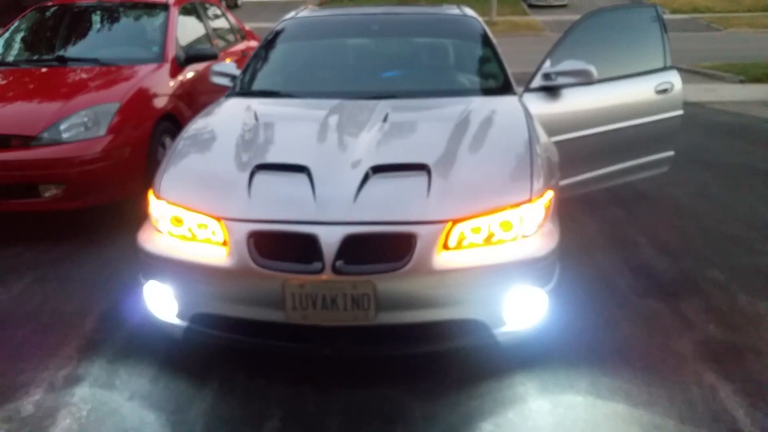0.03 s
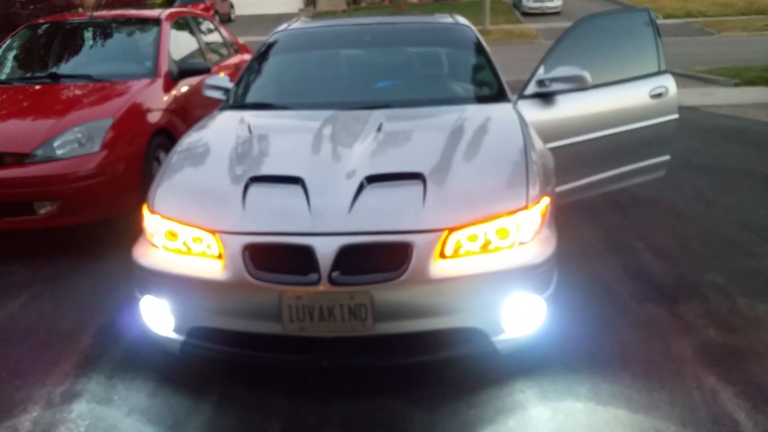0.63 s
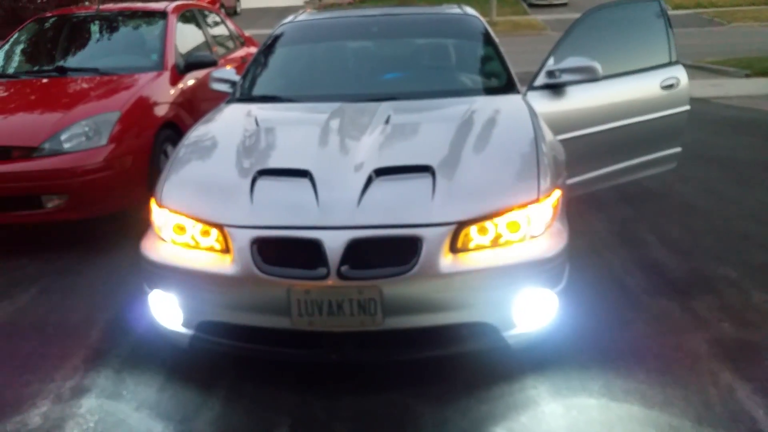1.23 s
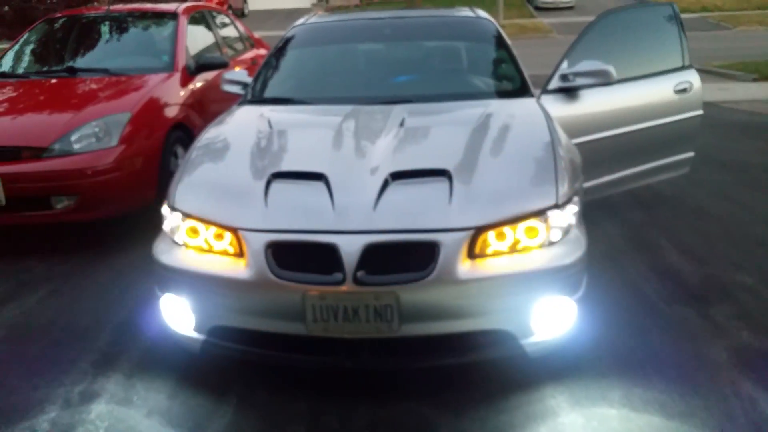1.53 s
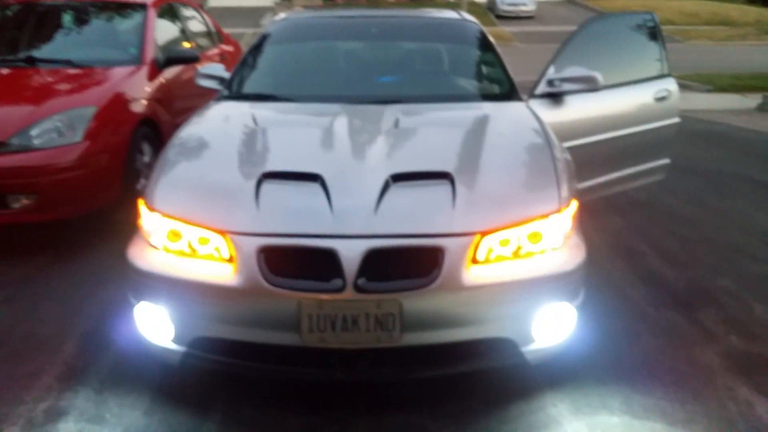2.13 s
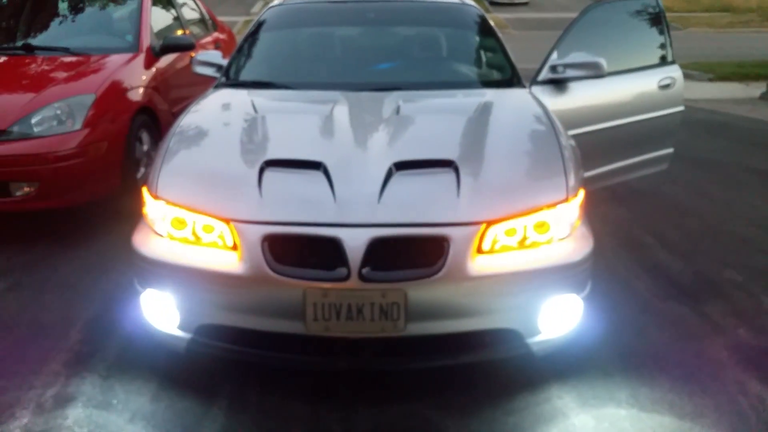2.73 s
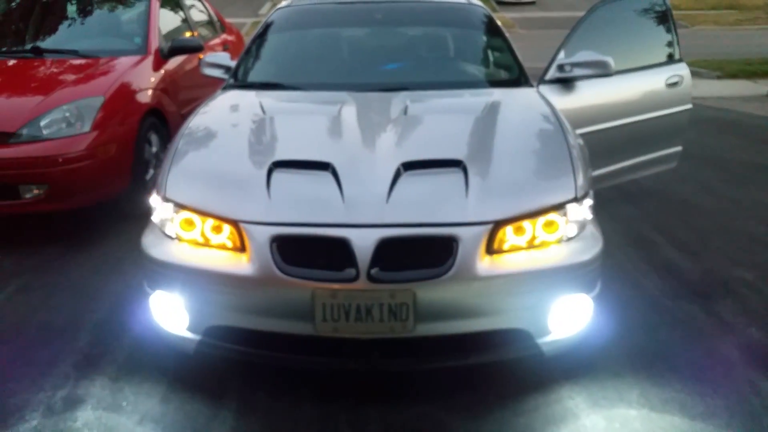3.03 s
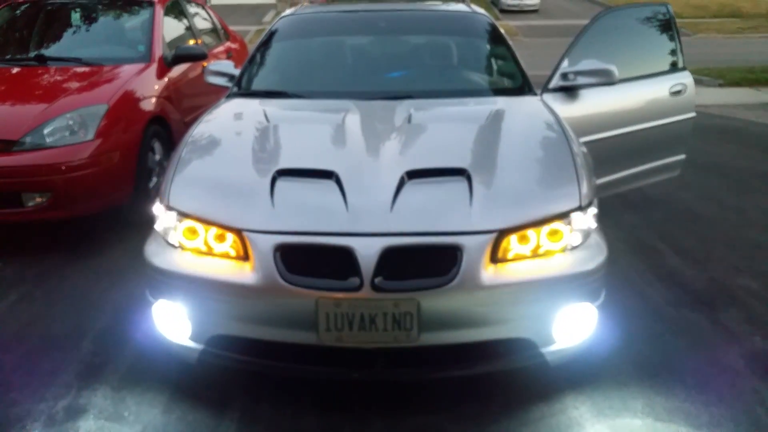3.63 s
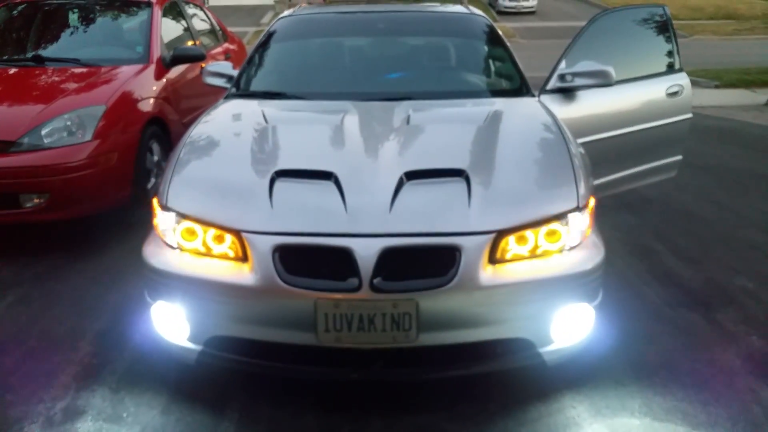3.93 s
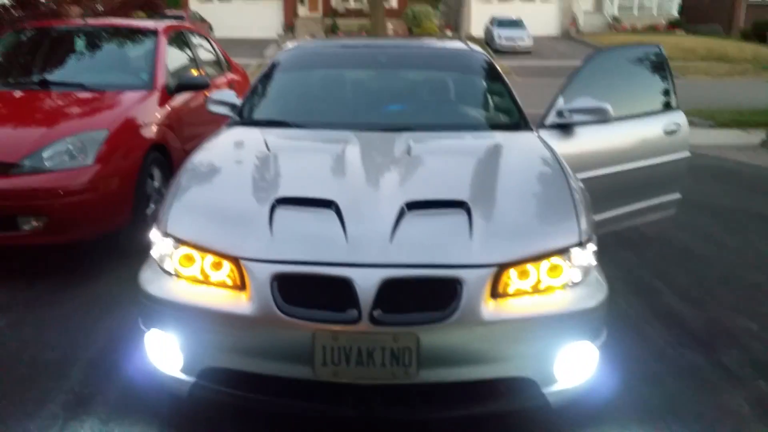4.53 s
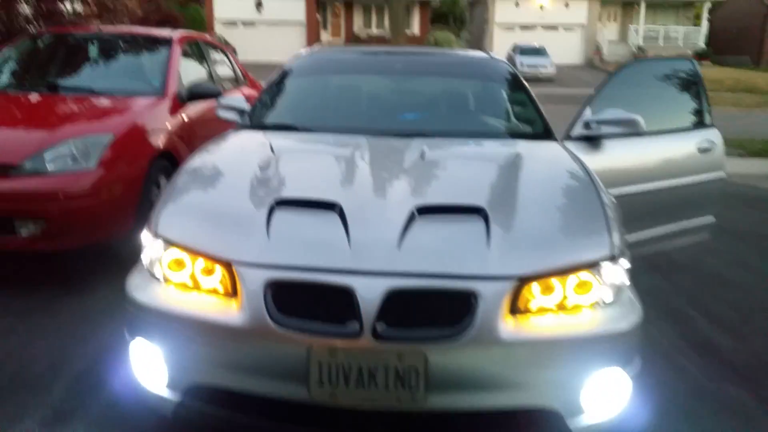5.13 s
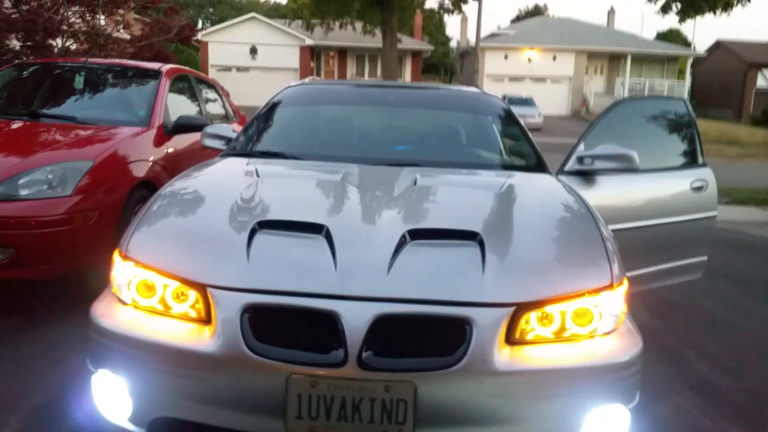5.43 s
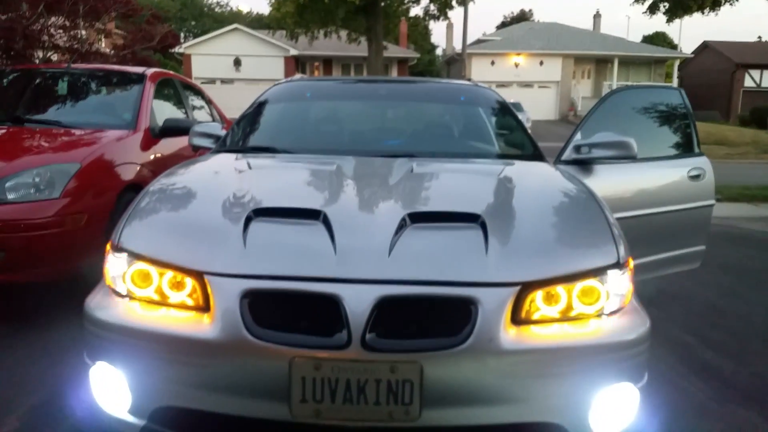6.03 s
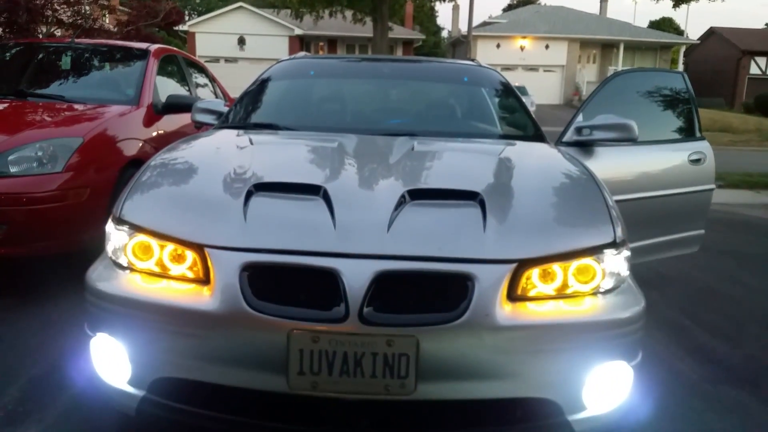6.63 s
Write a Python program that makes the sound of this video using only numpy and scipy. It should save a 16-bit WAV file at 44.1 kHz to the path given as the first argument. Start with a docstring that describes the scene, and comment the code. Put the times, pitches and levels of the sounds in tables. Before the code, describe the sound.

A car engine idles with a low, uneven hum and light valve ticking, while a shoe scuffs the asphalt twice.

```python
"""A six-cylinder car idles on a driveway, heard from in front; the sound fades in from 0.4 s.
Uneven firings of two banks boom through the exhaust's resonances, the engine bay rushes, valves tick
and parts rattle over a faint street rumble. The idle hunts; from 0.8 s spells of weak burns make it lope.
From 1.5 s the listener edges closer, and from 1.7 s a loose valve clacks now and then.
A shoe scuffs the asphalt at 2.4 s and 4.7 s."""
import sys
import numpy as np
from scipy import signal
from scipy.fft import rfft, irfft, next_fast_len
from scipy.io import wavfile
from scipy.ndimage import uniform_filter1d, minimum_filter1d, map_coordinates

SR = 44100
rng = np.random.default_rng(int(sys.argv[2]) if len(sys.argv) > 2 else 0)


def unload_wav(signal):
    """Save mono or channel-first audio to the path in sys.argv[1] as 16-bit WAV at rate SR, clipped to [-1, 1]."""
    wavfile.write(
        sys.argv[1],
        SR,
        np.round(np.clip(np.atleast_2d(signal).T, -1, 1) * 32767).astype(np.int16),
    )


N = 299439

# cylinders in firing order: (pulse strength [ratio], valve tick [dB])
FIRING_ORDER = [(0.86, -10.5), (1.09, 1.5), (0.85, -3), (1.034, 2.5), (0.88, -8.5), (0.81, 4)]


def amp(db):
    """Decibels to gain."""
    return 10 ** (np.asarray(db) / 20)


def unit(x):
    """Scale to rms 1."""
    return x / np.sqrt(np.mean(x ** 2) + 1e-20)


def along(points, hz):
    """Interpolate (frequency [Hz], value) points on a log axis."""
    f, v = np.transpose(points)
    return np.interp(np.log(hz + 1), np.log(f + 1), v)


def curve(points):
    """Interpolate (time [s], value) points at every sample."""
    return np.interp(np.arange(N) / SR, *np.transpose(points))


def wobble(rate_hz):
    """Smooth random curve with knots at rate_hz."""
    knots = rng.standard_normal(int(N * rate_hz / SR) + 4)
    return map_coordinates(knots, [np.arange(N) * rate_hz / SR])


def filtered(x, response):
    """Apply a complex frequency response."""
    m = next_fast_len(N + SR // 2)
    return irfft(rfft(x, m) * response(np.fft.rfftfreq(m, 1 / SR)), m)[..., :N]


def resonance(f, centre_hz, width_hz):
    """Causal response of one mode."""
    return 1j * f * width_hz / (centre_hz ** 2 - f ** 2 + 1j * f * width_hz)


def pan(db):
    """Stereo gains with left db above right."""
    return amp(np.array([[.5], [-.5]]) * db)


def stereo_noise(colour):
    """Coloured noise of rms 1; the sides are alike in the low mids, unrelated in the treble."""
    # (frequency [Hz], left-right likeness [ratio])
    likeness = [(60, -0.02), (130, 0.28), (290, 1), (640, 0.68), (1410, 0.43), (3100, 0.12), (6820, 0.006),
                (15000, -0.47)]

    def mid_side(f):
        angle = np.arccos(np.clip(along(likeness, f), 0, 1)) / 2
        return colour(f) * np.array([np.cos(angle), np.sin(angle)])

    mid, side = filtered(rng.standard_normal((2, N)), mid_side)
    return unit(np.array([mid + side, mid - side]))


def level_db(rpm, far_db, midway_db, close_db, db_per_rpm, idle_rpm=770):
    """Level of an engine source by listener position and engine speed."""
    # walk towards the hood: (time [s], place [0 far, 1 midway, 2 close])
    walk = [(1.5, 0.065), (2.25, 1.1), (4.4, 1.05), (5.15, 1.4), (5.65, 1.9), (6.25, 2)]
    return np.interp(curve(walk), [0, 1, 2], [far_db, midway_db, close_db]) + db_per_rpm * (rpm - idle_rpm)


def firings(crank):
    """Sample and cylinder of each whole crank step."""
    at = np.flatnonzero(np.diff(np.floor(crank)) > 0)
    return at, np.floor(crank[at + 1]).astype(int) % len(FIRING_ORDER)


def exhaust(crank, rpm, scatter=0.11, jitter_s=0.00047, gas_db=-22, thud_scatter=0.18, burble_scatter=0.66):
    """One uneven pulse a firing, plus turbulence; the banks alternate and drive the pipe differently."""
    # (frequency [Hz], width [Hz], front bank drive [signed gain], rear bank drive [signed gain])
    pipe_modes = [(59.5, 17.3, -0.28, -0.041), (70.2, 25, 0.309, 0.056), (103.9, 14.23, -0.39, 0.37),
                  (126.9, 22.46, 0.1916, -0.423), (134.2, 10.1, 0.021, 0.3), (175.5, 35.4, -0.079, 0.139),
                  (188, 27.8, 0.068, -0.114), (248.3, 8, -0.0112, 0.0016)]
    # thud, boom, hollow hum, burble: (far [dB], midway [dB], close [dB], slope [dB/rpm])
    band_levels = [(-23, -21.5, -19, -0.0272), (-14.4, -15.5, -20.5, 0.083), (-21, -18.5, -20.5, -0.056),
                   (-27.5, -26, -25, -0.0024)]
    edges_hz = [1, 86, 110, 152, 2000]
    at, cylinder = firings(crank)
    size_draw, time_draw, burble_draw, thud_draw = rng.standard_normal((len(at), 4)).T
    burn = burn_strength(crank, at)
    size = np.array(FIRING_ORDER)[cylinder, 0] * (1 + scatter * size_draw)
    onsets = np.clip(at + np.round(jitter_s * SR * time_draw).astype(int), 0, N - 1)
    turbulence = amp(gas_db) * rng.standard_normal((2, N))
    pipe = lambda f: sum(resonance(f, hz, width) * np.array([[front], [rear]])
                         for hz, width, front, rear in pipe_modes)
    muffler = lambda f: 1 / (1 + (37 / (f + 1)) ** 6) / (1 + (f / 320) ** 6)
    lowpass = lambda f, edge_hz: 1 / (1 + (f / edge_hz) ** 24)
    # weak burns cut the low bands most; the pulses' slow tails and sharp edges vary most
    strengths = [size * burn * (1 + thud_scatter * thud_draw),
                 size * burn,
                 size * (1 + burn) / 2,
                 size * (1 + burble_scatter * burble_draw)]
    out = np.zeros(N)
    for low_hz, high_hz, strength, levels in zip(edges_hz, edges_hz[1:], strengths, band_levels):
        banks = np.zeros((2, N))
        banks[cylinder % 2, onsets] = strength
        response = lambda f: pipe(f) * muffler(f) * (lowpass(f, high_hz) - lowpass(f, low_hz))
        band = filtered(unit(banks) + turbulence, response).sum(axis=0)
        power = uniform_filter1d(uniform_filter1d(band ** 2, size=SR // 4), size=SR // 4)
        out += band / np.sqrt(np.abs(power) + 1e-12) * amp(level_db(rpm, *levels))
    return out


def engine_bay(crank, rpm, throb=0.12, flicker_db=0.92):
    """Fan and intake rush and ring the panels, pulsing with the firings."""
    # (far [dB], midway [dB], close [dB], slope [dB/rpm])
    levels = (-37, -37, -36, 0.0182)
    # (frequency [Hz], density [dB])
    rush_spectrum = [(120, -10.5), (230, -3.5), (330, 0), (400, -7), (540, -5), (660, -5), (950, -4),
                     (1150, -7), (1900, -7.5), (2950, -11), (3800, -18), (5900, -22), (7800, -32.5),
                     (15500, -35)]
    # hood and brackets: (frequency [Hz], width [Hz], level [dB])
    panel_modes = [(230, 57, -2.5), (367, 30, -6), (557, 24, -11), (1024, 58, -1), (1320, 79, -8),
                   (1690, 40, -8.5), (2100, 82, -11.5), (2730, 31, -15), (2930, 96, -11.5),
                   (3220, 29, -11.5), (4900, 36, -24), (5160, 34, -27.5)]
    # (frequency [Hz], left over right [dB])
    balance = [(200, 0.5), (400, -1.5), (700, -0.5), (1200, -4.5), (2400, -4.5), (4400, -0.5), (8100, 3.5),
               (13000, -0.5)]
    pulse = 1 + throb * np.cos(2 * np.pi * crank)
    gain = amp(level_db(rpm, *levels) + flicker_db * wobble(60))
    panel_power = lambda f: sum(np.abs(amp(db) * resonance(f, hz, width) ** 2) ** 2
                                for hz, width, db in panel_modes)
    rush = stereo_noise(lambda f: np.sqrt(amp(along(rush_spectrum, f)) ** 2 + panel_power(f)))
    return filtered(gain * pulse * rush, lambda f: pan(along(balance, f)))


def bay_reflections(x, depth=0.31, decay_s=0.018):
    """Short echoes between hood, engine and ground colour each side differently."""
    t = np.arange(SR // 12) / SR
    echoes = rng.standard_normal((2, len(t))) * np.exp(-t / decay_s) * (1 - np.exp(-2 * t / decay_s))
    echoes *= depth / np.linalg.norm(echoes, axis=1, keepdims=True)
    return (x + signal.fftconvolve(x, echoes, axes=1)[:, :N]) / np.sqrt(1 + depth ** 2)


def valves(crank, rpm, lag_firings=0.39, scatter_db=1.6, attack_s=0.0034, decay_s=0.01, springs_db=-10):
    """Valves tick after each firing and ring their springs and the metal around them."""
    # (far [dB], midway [dB], close [dB], slope [dB/rpm])
    levels = (-54, -52.5, -52.5, 0.044)
    # (frequency [Hz], density [dB])
    tick_spectrum = [(1500, -31), (3000, -3.5), (5000, 3.5), (6200, 2.5), (7500, -9), (10000, -1),
                     (12500, 0), (15500, -12)]
    # (frequency [Hz], width [Hz], level [dB])
    metal_modes = [(2920, 66, -1), (3220, 40, 1.5), (5160, 54, 4), (5100, 43, 3), (6850, 130, 0),
                   (10100, 110, 0)]
    # (frequency [Hz], width [Hz], level [dB])
    spring_modes = [(4500, 30, -7), (4970, 26, -0.5), (5067, 24, -3.5), (5950, 33, -4), (6850, 36, -9.5),
                    (9900, 50, -11)]
    at, cylinder = firings(crank - lag_firings)
    hits = np.zeros(N)
    hits[at] = amp(np.array(FIRING_ORDER)[cylinder, 1] + scatter_db * rng.standard_normal(len(at)))
    t = np.arange(SR // 8) / SR
    envelope = signal.fftconvolve(hits, (1 - np.exp(-t / attack_s)) * np.exp(-t / decay_s))[:N]
    metal = lambda f: sum(amp(db) * np.abs(resonance(f, hz, width)) for hz, width, db in metal_modes)
    springs = lambda f: sum(amp(db) * resonance(f, hz, width) for hz, width, db in spring_modes)
    ticks = envelope * stereo_noise(lambda f: amp(along(tick_spectrum, f)) + metal(f))
    pings = unit(filtered(envelope * ticks, springs))
    return amp(level_db(rpm, *levels)) * (ticks + amp(springs_db) * pings)


def rattle(crank, rpm, rough_db=1.8, throb=0.15):
    """Quick uneven knocks, bunched twice a firing, keep engine parts ringing."""
    # block, belt cover, pulley, alternator: (frequency [Hz], width [Hz], left over right [dB],
    # far [dB], midway [dB], close [dB], slope [dB/rpm])
    parts = [(476, 35, 0, -49, -50, -42.3, .015), (837.6, 33, -3, -53.5, -44.3, -44.5, -0.0043),
             (901, 42, -2.5, -58.5, -51, -44, -0.01), (1493, 66, -11, -51.5, -49, -50.3, 0.0156)]
    bunching = 1 + throb * np.cos(4 * np.pi * crank)
    out = np.zeros((2, N))
    for hz, width, pan_db, *levels in parts:
        knocks = rng.standard_normal(N) * amp(rough_db * wobble(150)) * bunching
        ring = unit(filtered(knocks, lambda f: resonance(f, hz, width) * resonance(f, hz, 4 * width)))
        out += amp(level_db(rpm, *levels)) * ring * pan(pan_db)
    return out


def street(rumble_db=-52):
    """Faint low rumble of the neighbourhood."""
    # (frequency [Hz], density [dB])
    spectrum = [(5, -5), (35, 3.5), (200, -8.5), (2000, -53.5)]
    return amp(rumble_db) * stereo_noise(lambda f: amp(along(spectrum, f)))


def burn_strength(crank, at, sag_s=0.021):
    """Burn at each firing; while the engine stumbles it sags every second cycle."""
    # (start [s], end [s], strength lost [ratio])
    stumbles = [(0.771, .9, .9), (1.408, 1.55, 1), (2.829, 4.52, 0.99), (4.846, 5.6, 0.56),
                (5.282, 6.03, 0.8), (6.089, 6.78, .73)]
    t = np.arange(N) / SR
    burn = np.ones(len(at))
    for start_s, end_s, lost in stumbles:
        first, last = np.interp([start_s, end_s], t, crank)
        for step in np.arange(first, last, 2 * len(FIRING_ORDER)):
            centre_s = np.interp(step, crank, t)
            burn -= lost * np.exp(-((t[at] - centre_s) / sag_s) ** 2)
    return burn


def loose_valve(attack_s=.001, decay_s=.009):
    """The loosest valve now and then clacks, harder and brighter than the ticking."""
    # (time [s], level [dB])
    clacks = [(1.696, -47), (2.012, -50.5), (2.814, -50), (3.28, -51), (4.058, -51), (4.208, -47),
              (4.359, -48), (4.512, -47.5), (4.67, -50), (4.983, -51), (6.067, -47.5), (6.523, -46)]
    # (frequency [Hz], density [dB])
    spectrum = [(2000, -23.5), (5000, 1.5), (8000, -6.5), (10000, -1.5), (12300, 0.5), (15500, -12.5)]
    t = np.arange(SR // 8) / SR
    strike = (1 - np.exp(-t / attack_s)) * np.exp(-t / decay_s)
    envelope = np.zeros(N + len(t))
    for start_s, db in clacks:
        envelope[round(start_s * SR):][:len(t)] += amp(db) * strike
    return envelope[:N] * stereo_noise(lambda f: amp(along(spectrum, f)))


def shoe(landing_db=-2, landing_s=.018):
    """A sole lands with a soft knock, then drags briefly over asphalt."""
    # (time [s], length [s], level [dB])
    scuffs = [(2.408, .11, -35), (4.746, 0.22, -38.5)]
    # (frequency [Hz], density [dB])
    sole_spectrum = [(200, -26), (550, 0), (1200, -2), (2200, 2), (4000, -9), (8000, -22), (12000, -23.5),
                     (15500, -27.5)]
    t = np.arange(N) / SR
    landing, drag = np.zeros((2, N))
    for start_s, length_s, db in scuffs:
        landing += amp(db + landing_db) * np.exp(-((t - start_s) / landing_s - 1) ** 2)
        progress = np.clip((t - start_s) / length_s, 0, 1)
        drag += amp(db) * np.sqrt(np.abs(np.sin(np.pi * progress)))
    knock = stereo_noise(lambda f: np.abs(resonance(f, centre_hz=620, width_hz=450)) ** 2)
    friction = stereo_noise(lambda f: amp(along(sole_spectrum, f)))
    return landing * knock + drag * friction


def scene(left_lag_s=.00007, firings_per_rev=3):
    """The crank, counted in firings, paces the engine; the exhaust reaches the right side first."""
    # (time [s], speed [rpm])
    idle_speed = [(0.5, 768.6), (0.77, 775.2), (1.13, 718.1), (1.23, 754.1), (1.77, 791.1), (1.96, 727.2),
                  (2.18, 769.4), (2.42, 709.9), (2.82, 795.5), (3.04, 772.6), (3.84, 751.9), (4.01, 801.1),
                  (4.45, 795.3), (4.57, 769.8), (5.05, 762.1), (5.48, 805.4), (5.7, 753.4), (6.75, 800.6)]
    rpm = curve(idle_speed)
    crank = .8 + np.cumsum(rpm / 60 * firings_per_rev) / SR
    side_delay = lambda f: np.exp(1j * np.pi * f * left_lag_s * np.array([[-1], [1]]))
    boom = filtered(exhaust(crank, rpm), side_delay)
    rush = bay_reflections(engine_bay(crank, rpm))
    return boom + rush + valves(crank, rpm) + rattle(crank, rpm) + street() + loose_valve() + shoe()


def record(dry, ceiling=0.56, fade_out_s=.008, top_hz=15750):
    """Fade-in, peak limiter, click-free stop and band limit."""
    # (time [s], gain [dB])
    fade_in = [(.378, -110), (.388, -32.5), (.45, -23), (.5, -18), (.6, -8), (.7, -3), (.8, -0.5)]
    x = dry * amp(curve(fade_in))
    needed_gain = np.minimum(1, ceiling / (np.abs(x).max(axis=0) + 1e-9))
    limiter = uniform_filter1d(minimum_filter1d(needed_gain, size=SR // 50), size=SR // 50)
    left_s = np.arange(N)[::-1] / SR
    fade_out = np.sin(np.pi / 2 * np.minimum(1, left_s / fade_out_s)) ** 2
    return filtered(x * limiter * fade_out, lambda f: f < top_hz)


dry = scene()
out = record(dry)
unload_wav(out)
```